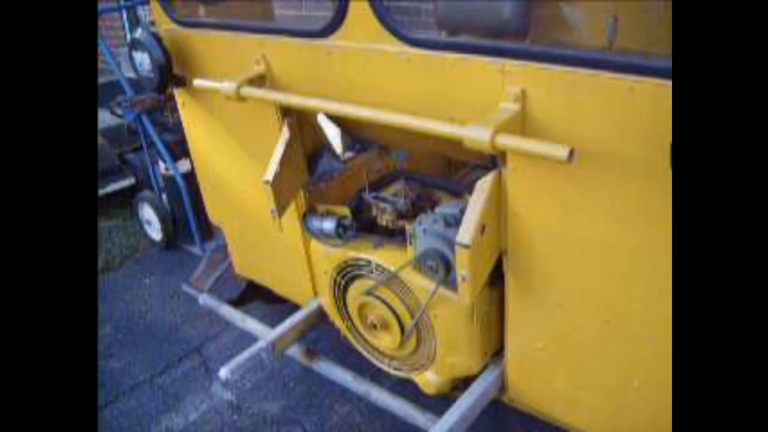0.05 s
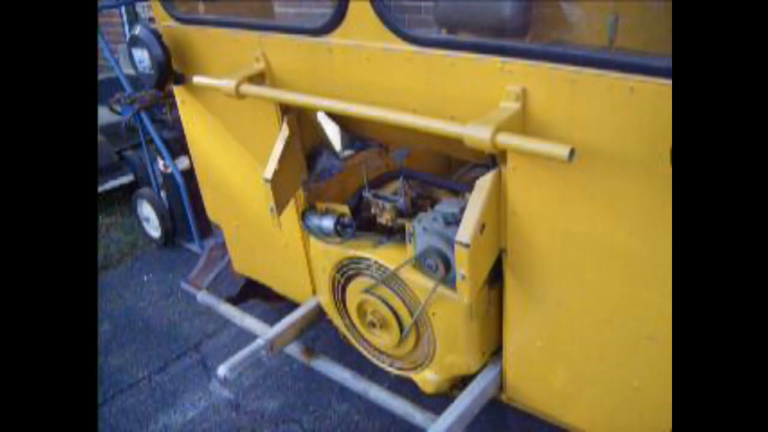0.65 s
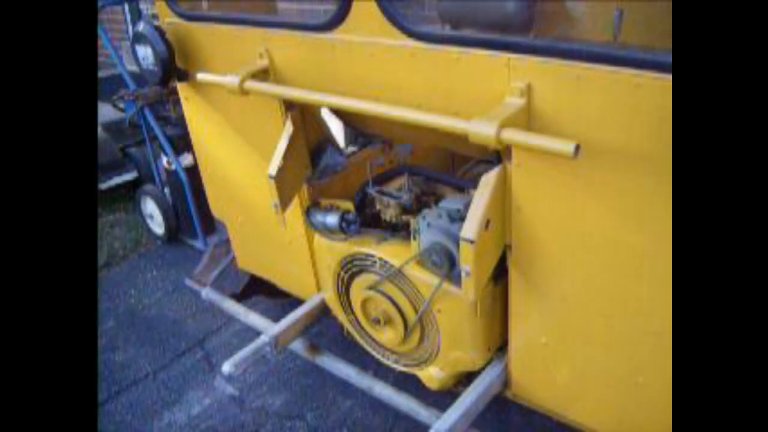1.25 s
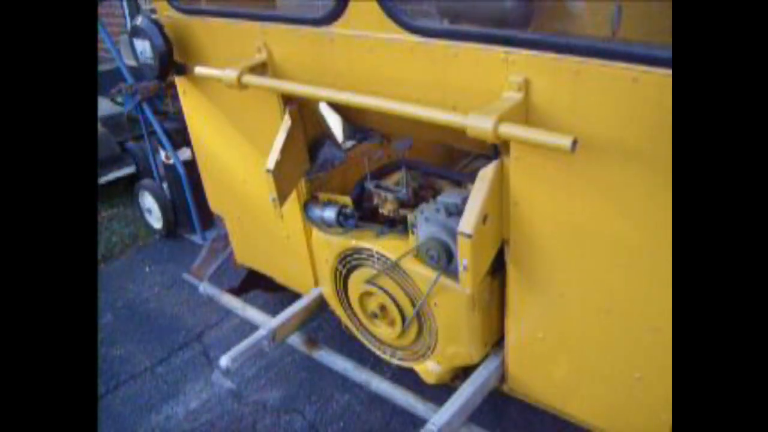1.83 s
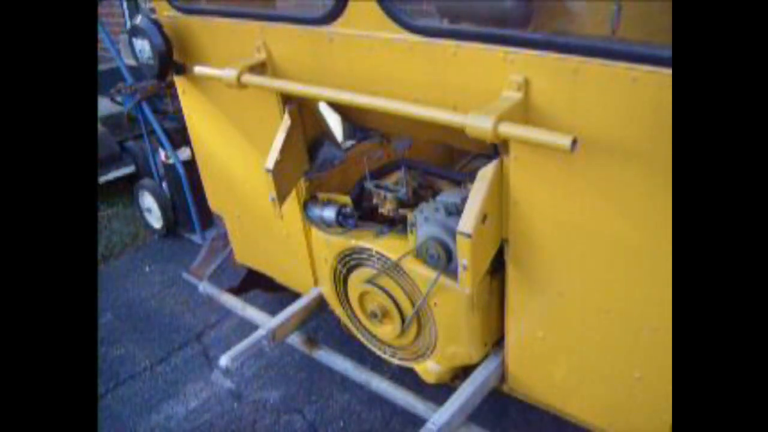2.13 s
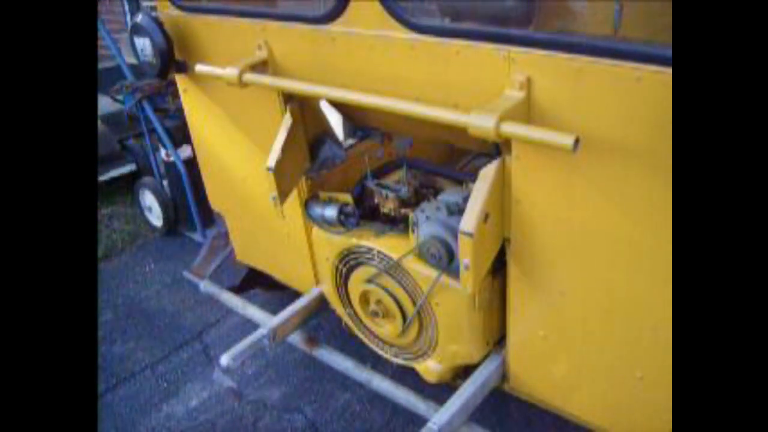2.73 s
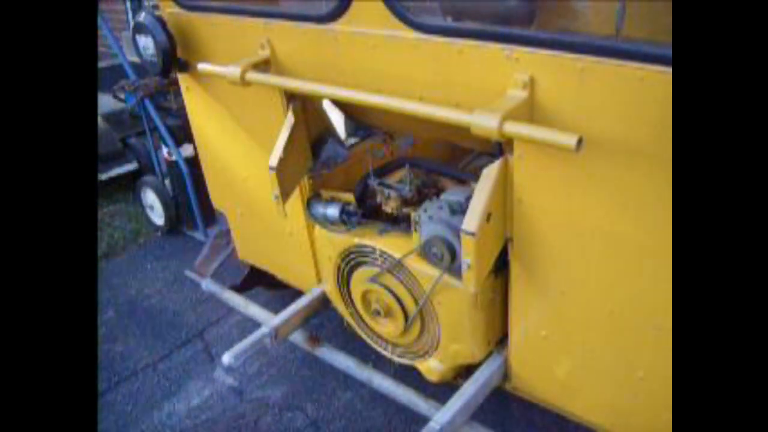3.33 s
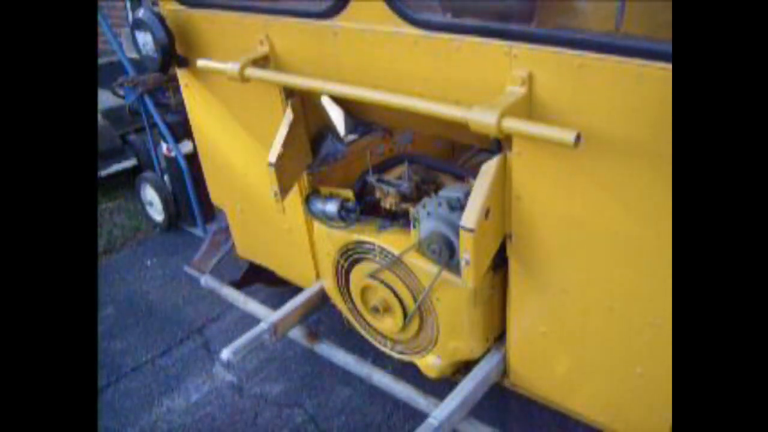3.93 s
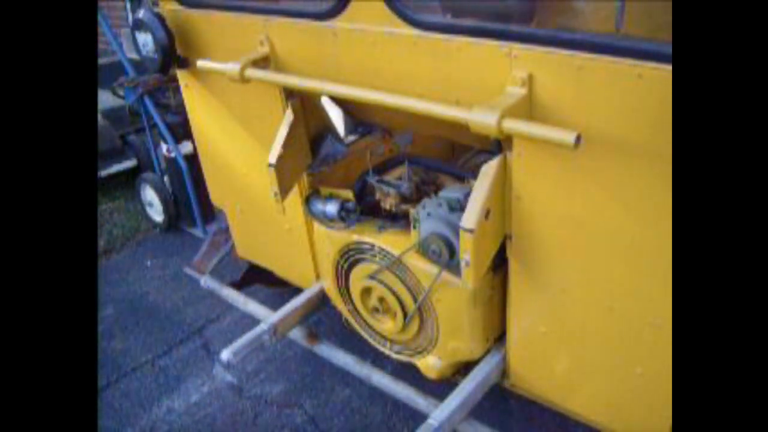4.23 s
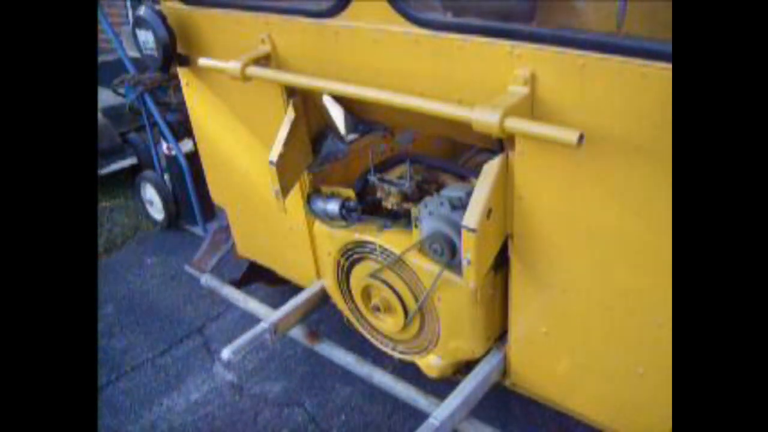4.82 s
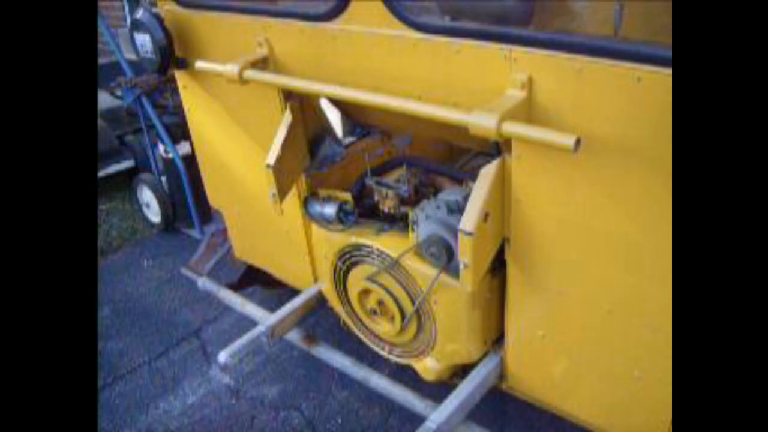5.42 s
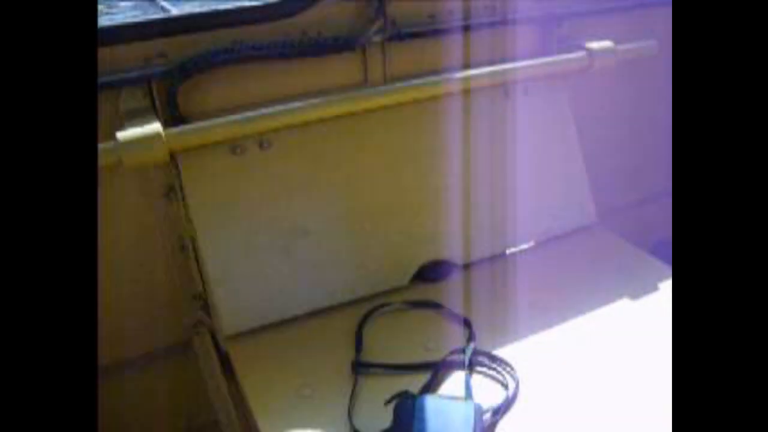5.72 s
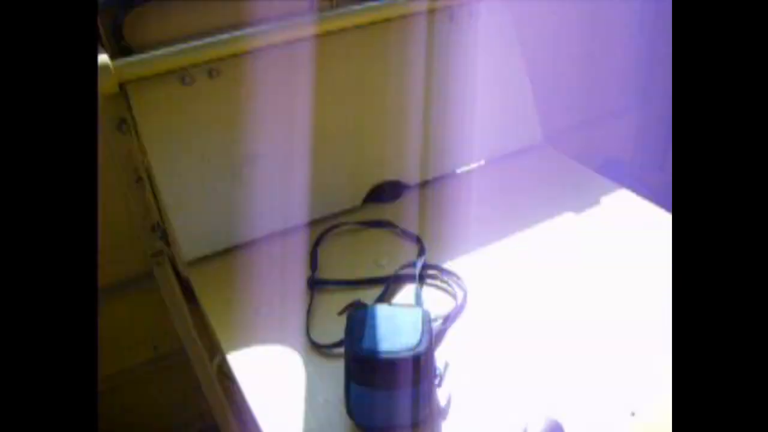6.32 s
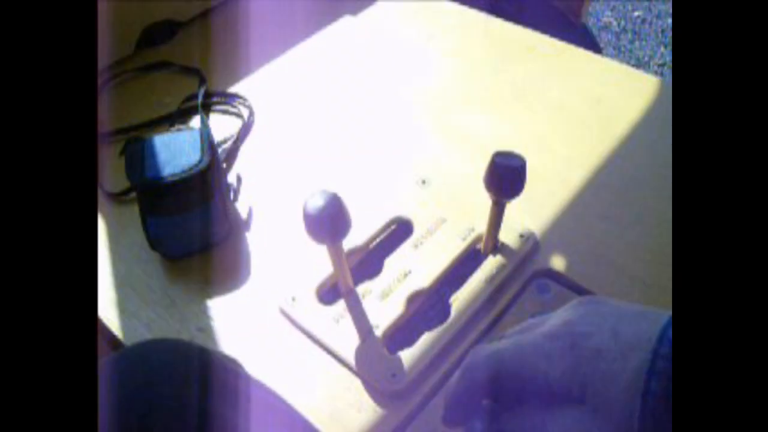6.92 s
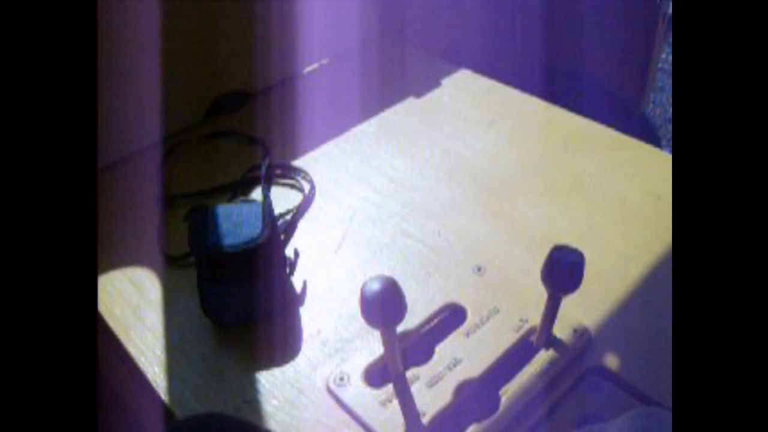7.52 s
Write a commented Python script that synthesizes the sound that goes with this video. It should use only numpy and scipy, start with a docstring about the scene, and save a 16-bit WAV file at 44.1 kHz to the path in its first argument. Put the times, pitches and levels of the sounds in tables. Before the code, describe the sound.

A soft microphone pop opens on a small petrol engine idling fast, heard close beside the open engine bay of a rail motorcar. Bright valve clatter and knocking ride steadily over a low exhaust rumble. After more than five seconds another pop moves the sound inside the cabin, where the engine is duller, throbbing and droning as it speeds up. A loose metal fitting buzzes faintly twice.

```python
"""Petrol engine of a rail motorcar

A four-cylinder engine idles fast beside its open bay, then is heard from the cabin as it speeds up.
Uneven exhaust puffs rumble in the muffler and the frame shudders. The block hums, and pistons, valves
and loose parts knock and rattle at fixed places in every cycle, ringing the panels. In the cabin the
air drones and a fitting buzzes twice. At each position the microphone comes on with a pop and fades up."""
import sys
import numpy as np
from scipy import signal
from scipy.fft import rfft, irfft
from scipy.io import wavfile

SR = 44100
rng = np.random.default_rng(int(sys.argv[2]) if len(sys.argv) > 2 else 0)


def output_pcm(signal):
    """Save a mono or channel-first signal as 16-bit PCM at the path in sys.argv[1].

    Samples are clipped to [-1, 1] before scaling.
    """
    pcm = np.clip(np.atleast_2d(signal).T, -1, 1) * 32767
    wavfile.write(sys.argv[1], SR, np.round(pcm).astype(np.int16))


N = 333396
TIME = np.arange(N) / SR
OUTSIDE_ON_S, CABIN_ON_S, MOVE_S = .0832, 5.6, 5.617

# The four firings, in relative levels: (place [cycles], puff outside [dB], puff in the cabin [dB],
# rattle outside [dB], rattle in the cabin [dB])
CYLINDER_FIRINGS = [(-.058, 30, 31, 3, -7), (0.261, 26.5, 33, -0.5, -7), (.445, 29.5, 36.5, -3.5, 0),
                    (.73, 20, 22, -1.5, -2)]
# Modes of block and panels: (frequency [Hz], width [Hz], lift outside [dB], lift in the cabin [dB])
PANEL_MODES = [(211.7, 17, 7, -5.5), (241, 35, 1.5, 2.5), (472.4, 21.5, 8, 3.5), (739, 17, 5, 6),
               (856, 46, 5.5, 5), (1023, 18, 7.5, 3.5), (1102, 15, 7, -4), (1157, 18, 6, 9.5),
               (1196, 22, 6.5, 4.5), (1298, 17, 6, -3), (1464, 19, 5.5, -3), (1576, 19, 8, 7),
               (1750, 82, 4.5, 3), (2128, 59, 5.5, 9.5), (2360, 37, -1.5, 1), (2746, 136, 5, 1.5),
               (2900, 46, 4, 5), (3232, 65, 7, 1), (3508, 41, 6.5, 8), (3837, 145, 5.5, 0.5),
               (4290, 120, 5, -1), (5060, 80, 2.5, -3), (5620, 105, 4.5, 2)]


def from_db(db):
    """Amplitude grows tenfold for every 20 dB."""
    return 10 ** (np.asarray(db) / 20)

def unit_rms(x):
    """Normalisation to unit mean power."""
    return x / np.sqrt(np.mean(x ** 2) + 1e-20)

def butter(x, hz, kind, order=2):
    """A Butterworth filter, maximally flat in its passband."""
    return signal.sosfilt(signal.butter(order, hz, kind, fs=SR, output="sos"), x + 1e-18)

def resonance(x, hz, width_hz):
    """A damped resonator with unit gain at its peak."""
    return signal.lfilter(*signal.iirpeak(hz, hz / width_hz, fs=SR), x + 1e-18)

def decay(start_s, decay_s):
    """Exponential relaxation after a unit step."""
    return (TIME >= start_s) * np.exp(-np.maximum(TIME - start_s, 0) / decay_s)

def microphone_pop(start_s, level_db, settle_s):
    """Step response: the bias jumps at switch-on, then leaks away."""
    return from_db(level_db) * decay(start_s, settle_s)

def fade_up(start_s, rise_s, from_level_db):
    """The microphone's gain rises linearly to unity."""
    return np.interp(TIME, [start_s, start_s + rise_s], [from_db(from_level_db), 1])

def engine_cycles(speed, start):
    """Phase is the integral of speed; it equals `start` at the curve's first point."""
    turned = np.cumsum(np.interp(TIME, *np.transpose(speed))) / SR
    return turned - np.interp(speed[0][0], TIME, turned) + start

def impulses(cycles, place, level_db, spread_db, jitter_s):
    """A quasi-periodic impulse train: one per cycle, scattered in time and strength."""
    number = np.arange(np.floor(cycles[0]), np.ceil(cycles[-1]) + 1)
    timing, strength = rng.standard_normal((len(number), 2)).T
    due_s = np.interp(number + place, cycles, TIME, left=-1, right=-1)
    at = ((due_s + jitter_s * timing) * SR).astype(int)
    heard = (at >= 0) & (at < N)
    train = np.zeros(N)
    train[at[heard]] = from_db(level_db + spread_db * strength[heard])
    return train

def exhaust(cycles, firings, pipe_hz, boom_hz, boom_width_hz, boom_db, muffler_hz, spread_db):
    """Puffs excite a pipe resonance; the muffler cancels one band and acts as an acoustic low-pass."""
    puffs = sum(impulses(cycles, place, db, spread_db, jitter_s=.0003) for place, db in firings)
    flow = butter(puffs, [20, pipe_hz], "band")
    flow = flow + from_db(boom_db) * resonance(flow, boom_hz, boom_width_hz)
    flow = flow - resonance(flow, hz=121.4, width_hz=30)
    return butter(flow, muffler_hz, "low", order=4)

def frame_shudder(level_db, low_hz, high_hz):
    """Forced vibration: shaken by the engine, the frame radiates a low band of noise."""
    noise = butter(rng.standard_normal(N), low_hz, "high")
    return from_db(level_db) * unit_rms(butter(noise, high_hz, "low"))

def bodywork(colour, modes):
    """Minimum-phase impulse response of a broad spectrum with Lorentzian peaks and dips."""
    size = 2 ** 14
    hz = np.maximum(np.fft.rfftfreq(size, 1 / SR), 1)
    colour_hz, colour_db = np.transpose(colour)
    level_db = np.interp(np.log(hz), np.log(colour_hz), colour_db)
    for centre, width, lift_db in modes:
        level_db += lift_db / (1 + (2 * (hz - centre) / width) ** 2)
    cepstrum = irfft(np.log(from_db(level_db)))
    cepstrum[1:size // 2] *= 2  # folding onto positive time makes the response causal
    cepstrum[size // 2 + 1:] = 0
    return irfft(np.exp(rfft(cepstrum)))

def through(x, response):
    """Transmission through the bodywork is a convolution, here scaled to unit rms."""
    return unit_rms(signal.oaconvolve(x, response)[:N])

def block_hum(cycles, fall_db_per_octave, waver_db, wander_rad):
    """The block vibrates at harmonics of the crank rate, each modulated at random in level and phase."""
    number = np.arange(np.floor(cycles[0]), np.ceil(cycles[-1]) + 1)
    hum = 0
    for harmonic in range(7, 27):
        waver, wander = (np.interp(cycles, number, row) for row in rng.standard_normal((2, len(number))))
        level_db = waver_db * waver - fall_db_per_octave * np.log2(harmonic)
        phase = 2 * np.pi * (2 * harmonic * cycles + rng.random())  # two crank turns per cycle
        hum += from_db(level_db) * np.sin(phase + wander_rad * wander)
    return hum

def valve_contacts(first_dbs):
    """Three ever weaker valve-gear impacts follow each firing: (place [cycles], level [dB])."""
    lag_cycles, gap_cycles, fall_db = .09, .06, 3.5
    return [(firing[0] + lag_cycles + k * gap_cycles, db - k * fall_db)
            for firing, db in zip(CYLINDER_FIRINGS, first_dbs) for k in range(3)]

def piston_slaps():
    """An impact and its rebound on each crank turn: (place [cycles], level [dB])."""
    place, slap_db, rebound_cycles, rebound_db = .37, 4, .0501, 0
    pair = [(place, slap_db), (place + rebound_cycles, rebound_db)]
    return [(at + turn, db) for turn in (0, .5) for at, db in pair]

def knocks(cycles, ring_s, soft_hz, jitter_s, spread_db):
    """Impact excitation: each contact strikes its own spot on the block, with its own short, dull ring."""
    age = np.arange(SR // 20) / SR
    knocking = 0
    for place, db in valve_contacts(first_dbs=[-1.5] * 4) + piston_slaps():
        ring = unit_rms(rng.standard_normal(len(age)) * np.exp(-age / ring_s))
        knocking += signal.oaconvolve(impulses(cycles, place, db, spread_db, jitter_s), ring)[:N]
    return butter(knocking, soft_hz, "low", order=1)

def rattle(cycles, first_dbs, decay_s, whirr_db, whirr_hz, grain_db, spread_db, thin_hz):
    """Loose parts dissipate each valve impact's energy in ticks, over the even whirr of fan and belt."""
    hits = sum(impulses(cycles, place, db, spread_db, jitter_s=.0004)
               for place, db in valve_contacts(first_dbs))
    energy = signal.lfilter([1], [1, -np.exp(-2 / (decay_s * SR))], hits ** 2 + 1e-18)
    ticks = rng.standard_normal(N) * from_db(grain_db * np.minimum(rng.exponential(1, N), 5))
    whirr = from_db(whirr_db) * butter(rng.standard_normal(N), whirr_hz, "low", order=1)
    return butter(np.sqrt(energy) * unit_rms(ticks) + whirr, thin_hz, "high", order=1)

def outside():
    """Radiation from the open bay at fast idle: bright clatter over an even rumble."""
    # Engine speed: (time [s], rate [four-stroke cycles/s])
    idle_speed = [(0, 13.316), (1, 13.118), (2.5, 12.941), (3.3, 13.132), (4.8, 13.148), (5.6, 13.396)]
    # Spectral envelope of the open bay: (frequency [Hz], relative level [dB])
    bay_colour = [(60, -21.5), (110, 5), (150, 8.5), (220, 4), (360, -3.5), (550, -0.5), (720, -3.5),
                  (1100, -2.5), (2000, -6.5), (4000, -7.5), (5600, -10.5), (6800, -16.5), (10300, -12.5),
                  (11900, -28)]
    cycles = engine_cycles(idle_speed, start=-.092)
    places, puff_dbs, _, rattle_dbs, _ = np.transpose(CYLINDER_FIRINGS)
    bay = bodywork(bay_colour, [(hz, width, db) for hz, width, db, _ in PANEL_MODES])
    rumble = exhaust(cycles, zip(places, puff_dbs), pipe_hz=63.7, boom_hz=91, boom_width_hz=23.6,
                     boom_db=11, muffler_hz=72.2, spread_db=2.06)
    frame = frame_shudder(level_db=-41.5, low_hz=24.8, high_hz=90)
    hum = block_hum(cycles, fall_db_per_octave=3, waver_db=3, wander_rad=.78)
    knock = knocks(cycles, ring_s=.0067, soft_hz=650, jitter_s=.00013, spread_db=.6)
    ticks = rattle(cycles, rattle_dbs, decay_s=.014, whirr_db=-.5, whirr_hz=4640,
                   grain_db=1.5, spread_db=1.24, thin_hz=483)
    return (rumble + frame
            + from_db(-38) * through(hum, bay)
            + from_db(-35.5) * through(knock, bay)
            + from_db(-28.5) * through(ticks, bay))

def cabin_air(x, hz, width_hz, direct_db, ring_db):
    """A cavity mode stores energy over several periods, joining the puffs into a drone."""
    return from_db(direct_db) * x + from_db(ring_db) * resonance(x, hz, width_hz)

def cabin():
    """Transmission loss in the bulkhead dulls the treble; the exhaust throbs, knocks grow with speed."""
    # Engine speed: (time [s], rate [four-stroke cycles/s])
    rising_speed = [(5.62, 9.76), (5.9, 10.38), (6.2, 11.41), (6.5, 12.26), (6.8, 13.32), (7.1, 13.95),
                    (7.35, 14.17), (7.56, 13.85)]
    # Spectral envelope behind the bulkhead: (frequency [Hz], relative level [dB])
    wall_colour = [(50, 8.5), (115, -0.5), (155, 9), (245, 7.5), (310, 2), (450, 2), (700, -3.5),
                   (1100, -6), (2000, -10.5), (4200, -10.5), (5600, -14), (7000, -20), (10300, -22),
                   (11900, -37.5)]
    cycles = engine_cycles(rising_speed, start=-.61)
    doublings = np.log2(np.interp(TIME, *np.transpose(rising_speed)) / 13)  # of speed, from 13 cycles/s
    places, _, puff_dbs, _, rattle_dbs = np.transpose(CYLINDER_FIRINGS)
    walls = bodywork(wall_colour, [(hz, width, db) for hz, width, _, db in PANEL_MODES])
    lead_cycles = .487  # the pipe under the floor is heard ahead of the clatter
    boom = exhaust(cycles + lead_cycles, zip(places, puff_dbs), pipe_hz=228, boom_hz=74,
                   boom_width_hz=12.5, boom_db=4.5, muffler_hz=98, spread_db=2)
    drone = cabin_air(boom, hz=84.2, width_hz=13, direct_db=-5, ring_db=-4)
    hum = block_hum(cycles, fall_db_per_octave=2, waver_db=6.5, wander_rad=.5)
    knock = knocks(cycles, ring_s=.0087, soft_hz=600, jitter_s=.00029, spread_db=.5)
    ticks = rattle(cycles, rattle_dbs, decay_s=.017, whirr_db=-1.5, whirr_hz=4040,
                   grain_db=2.5, spread_db=1.5, thin_hz=530)
    frame = frame_shudder(level_db=-31, low_hz=25, high_hz=79)
    return (from_db(.5 - 6 * doublings) * drone + frame
            + from_db(-37 + 20 * doublings) * through(hum, walls)
            + from_db(-31.5 + 8 * doublings) * through(knock, walls)
            + from_db(-30.5 + 3 * doublings) * through(ticks, walls))

def loose_fitting():
    """A thin metal part, shaken at its resonance, gives a narrow, quickly damped buzz."""
    # Onsets of the buzz: (time [s], level [dB])
    buzzes = [(6.535, -37), (6.845, -37)]
    shake = sum(from_db(db) * decay(start_s, decay_s=.038) for start_s, db in buzzes)
    return shake * unit_rms(resonance(rng.standard_normal(N), hz=3420, width_hz=220))

def scene():
    """Two listening positions in turn, with a switch-on pop superposed on each."""
    beside = outside() * (TIME >= OUTSIDE_ON_S) * fade_up(OUTSIDE_ON_S, rise_s=.5, from_level_db=-19.5)
    inside = (cabin() + loose_fitting()) * fade_up(MOVE_S, rise_s=.31, from_level_db=-13)
    pops = microphone_pop(OUTSIDE_ON_S, level_db=-9.5, settle_s=.083)
    pops += microphone_pop(CABIN_ON_S, level_db=-7, settle_s=.066)
    return (np.where(TIME < MOVE_S, beside, inside) + pops)[None]

def record(dry):
    """Band limiting: an elliptic low-pass cuts the top steeply."""
    cutoff_hz = 11946
    return signal.sosfilt(signal.ellip(10, .1, 90, cutoff_hz, fs=SR, output="sos"), dry)


dry = scene()
out = record(dry)
output_pcm(out)
```